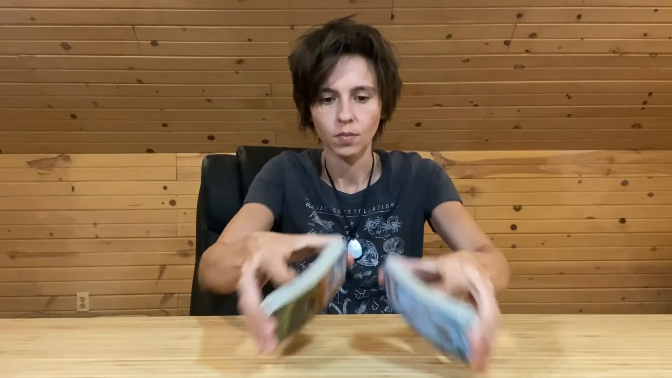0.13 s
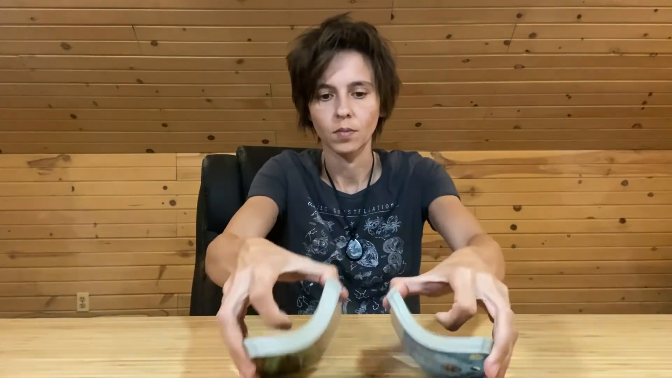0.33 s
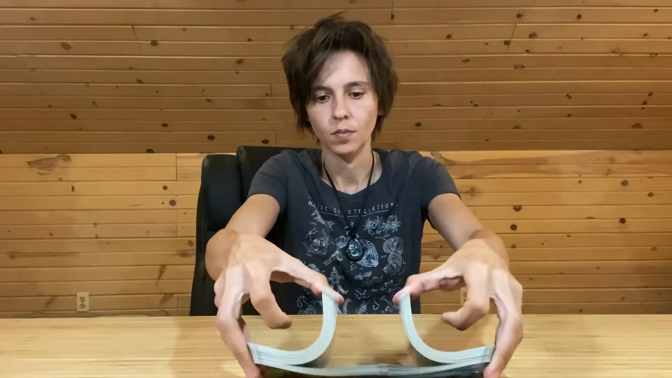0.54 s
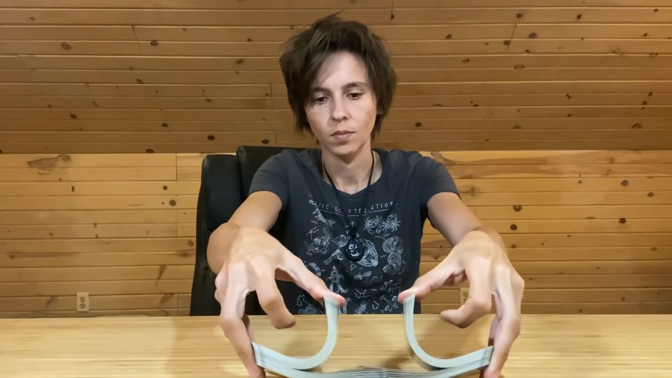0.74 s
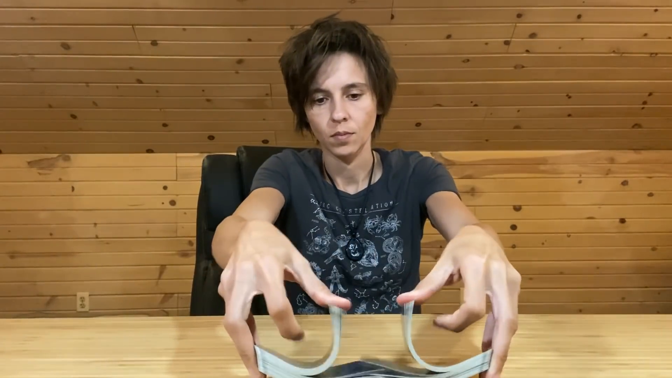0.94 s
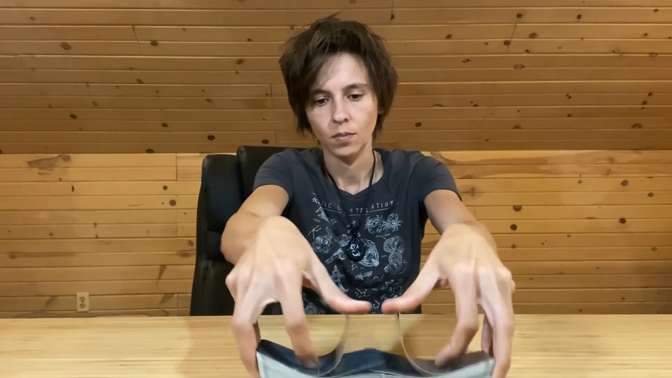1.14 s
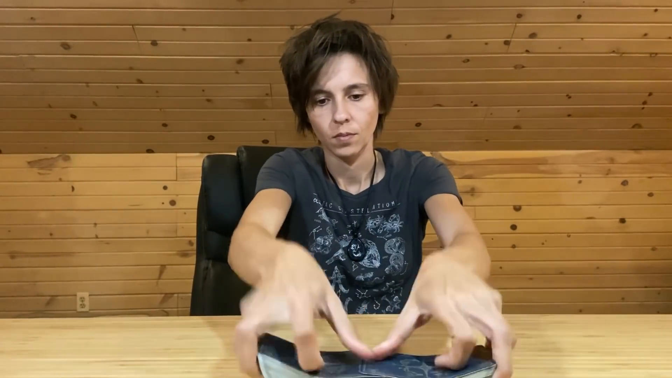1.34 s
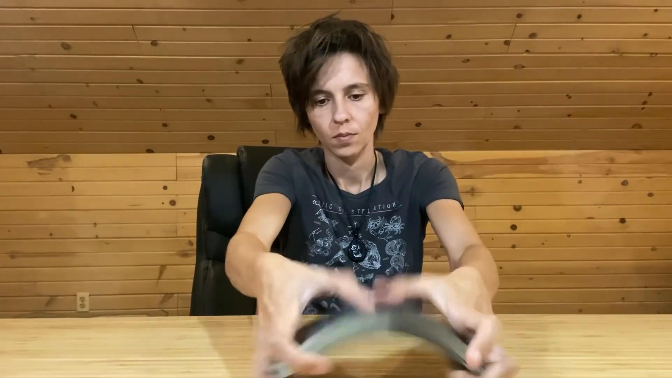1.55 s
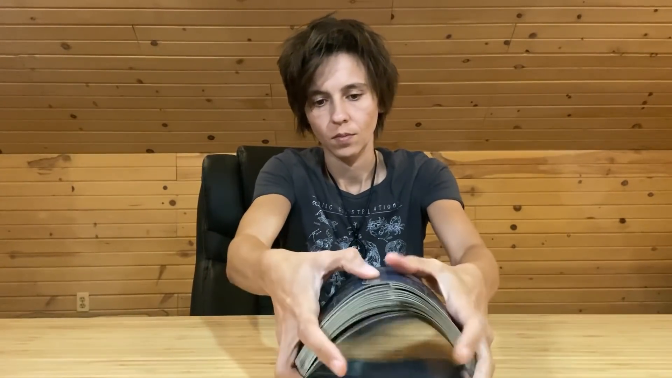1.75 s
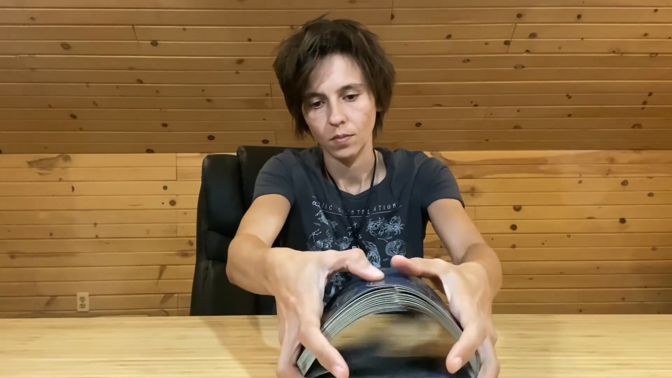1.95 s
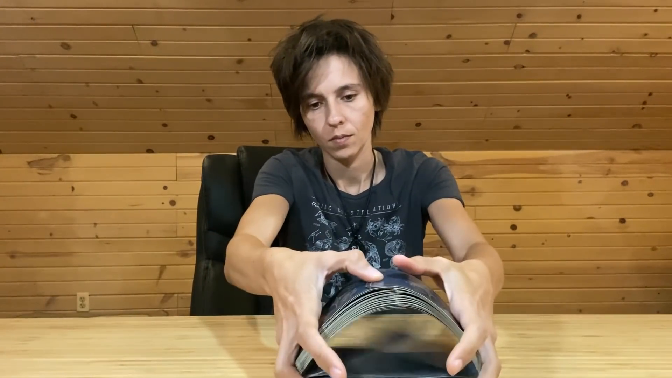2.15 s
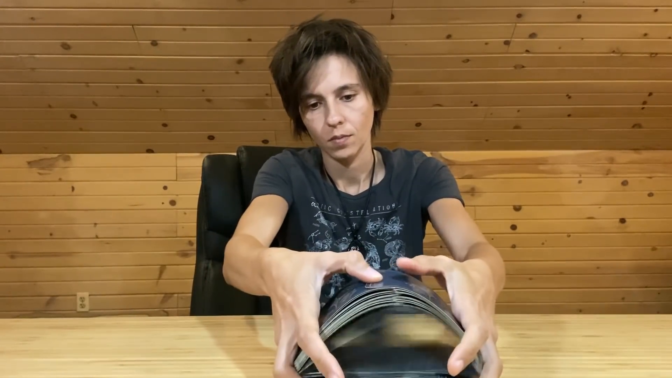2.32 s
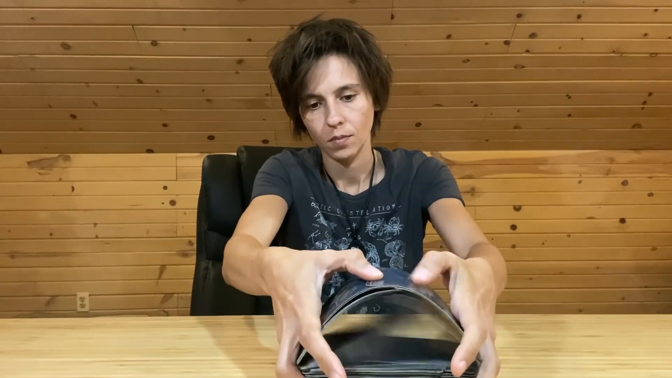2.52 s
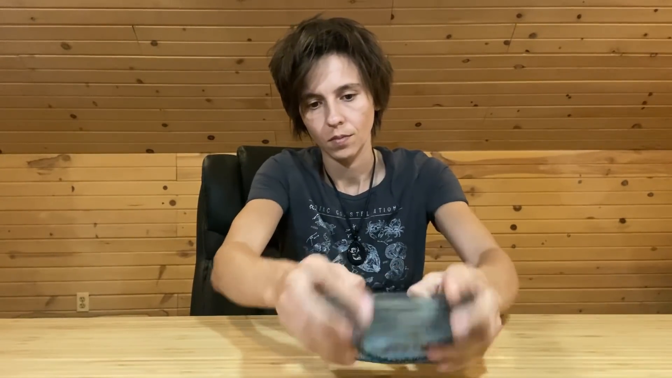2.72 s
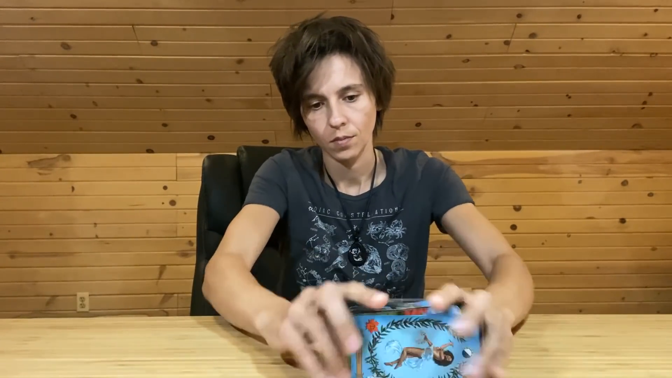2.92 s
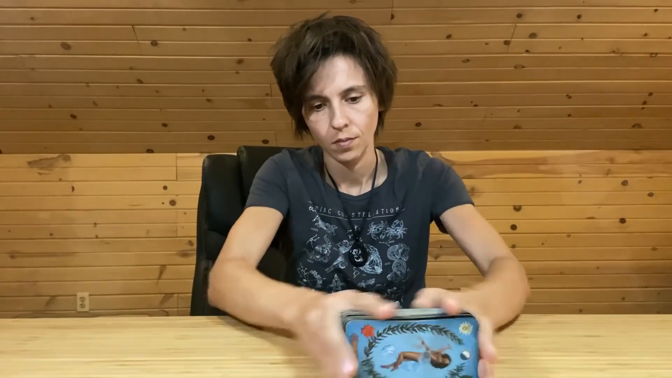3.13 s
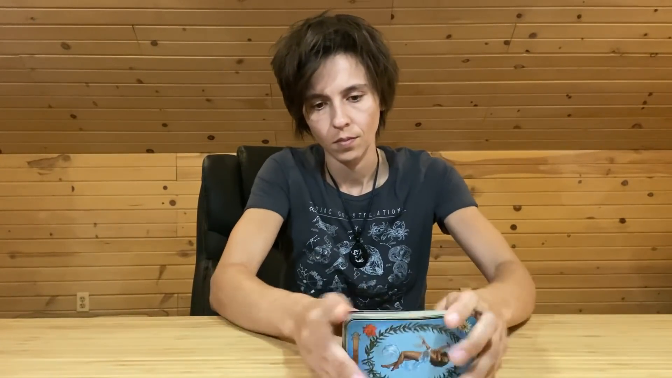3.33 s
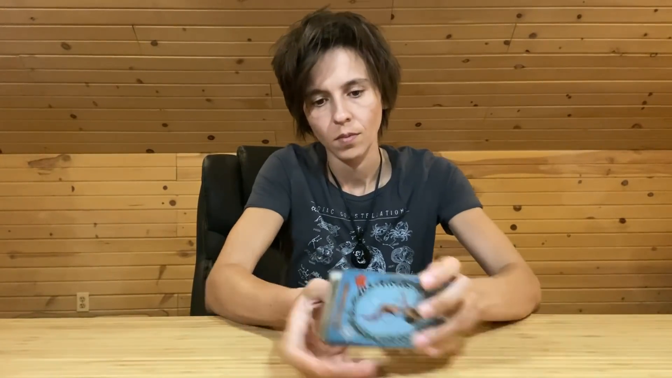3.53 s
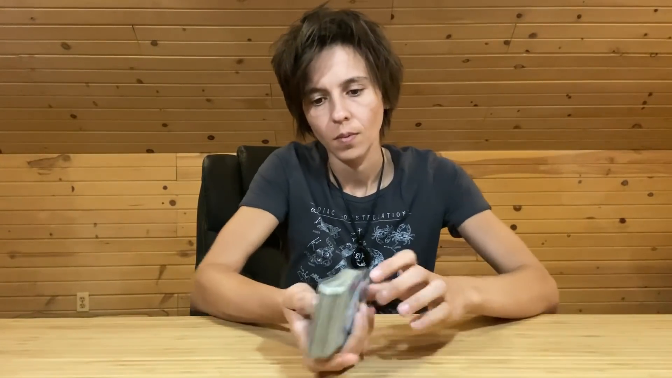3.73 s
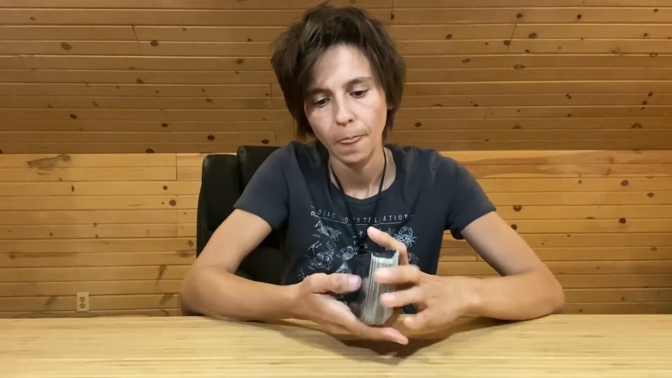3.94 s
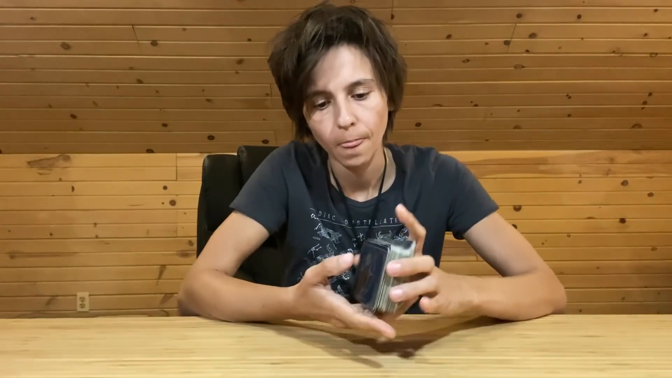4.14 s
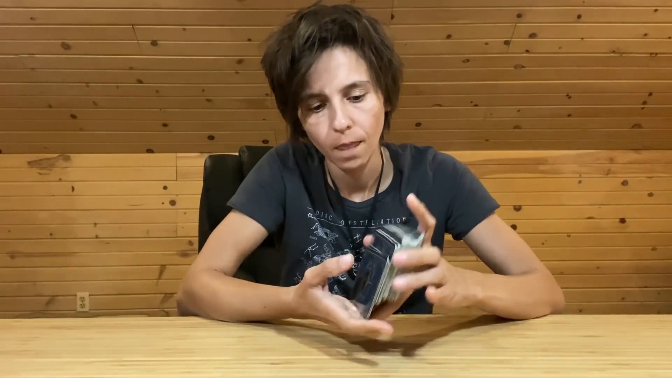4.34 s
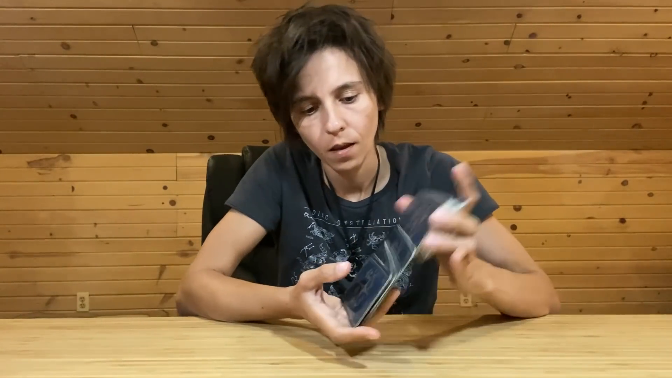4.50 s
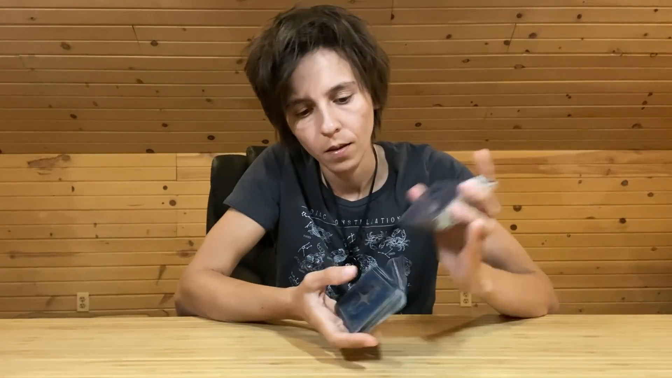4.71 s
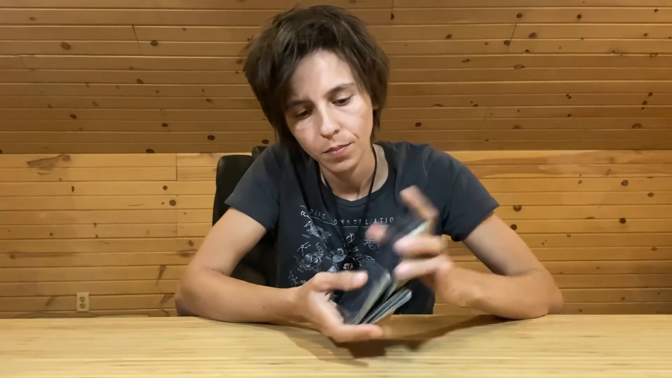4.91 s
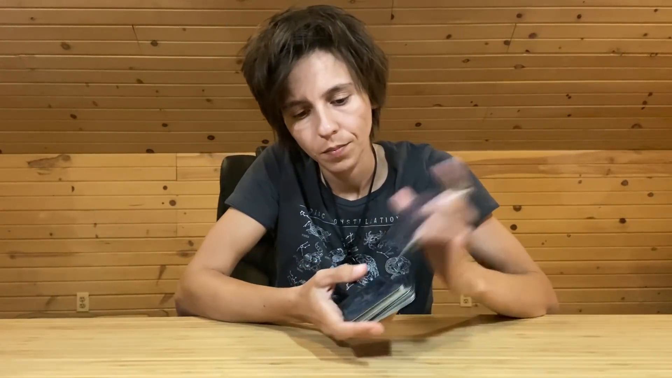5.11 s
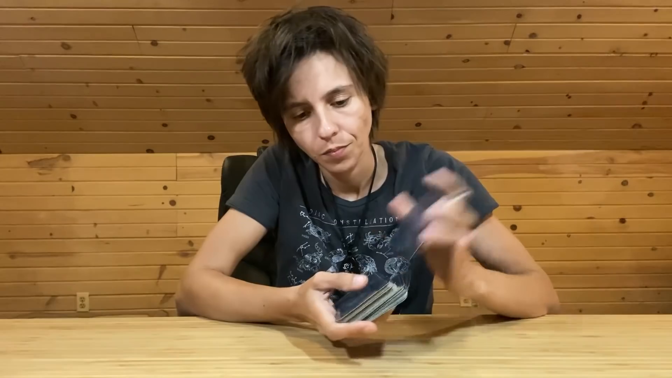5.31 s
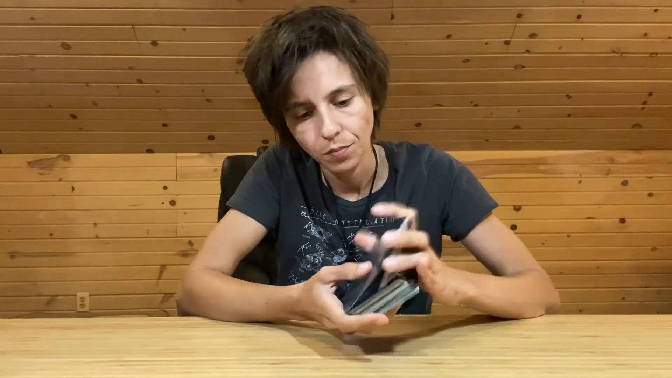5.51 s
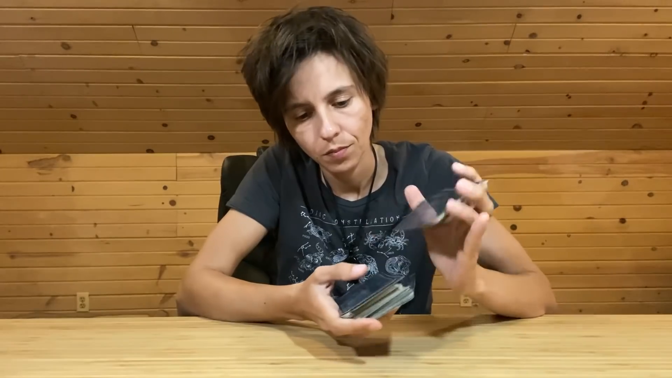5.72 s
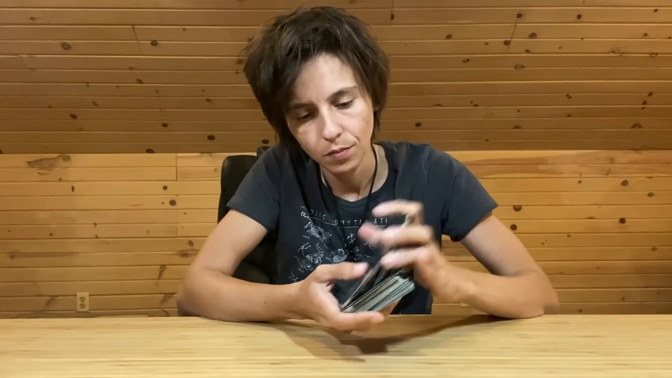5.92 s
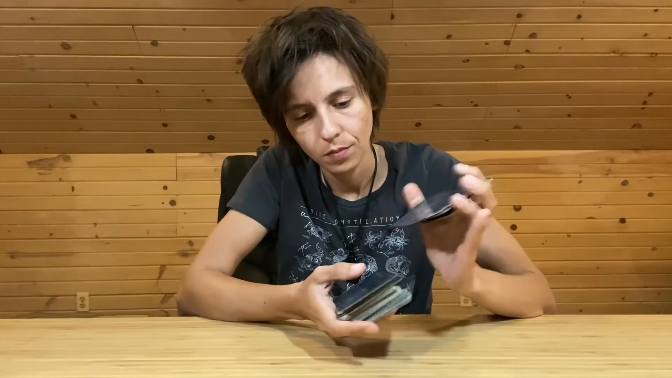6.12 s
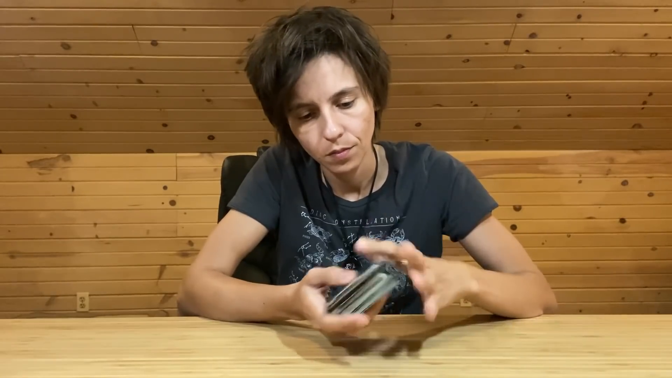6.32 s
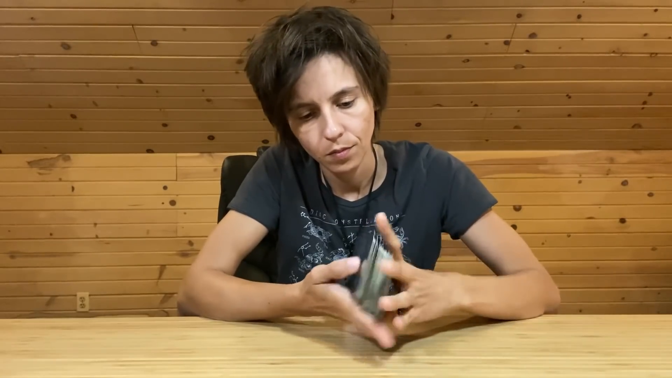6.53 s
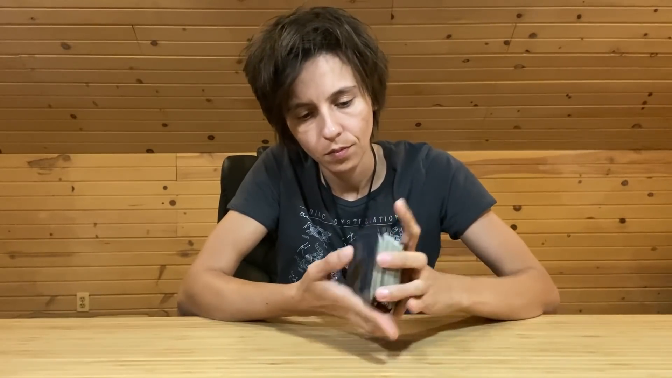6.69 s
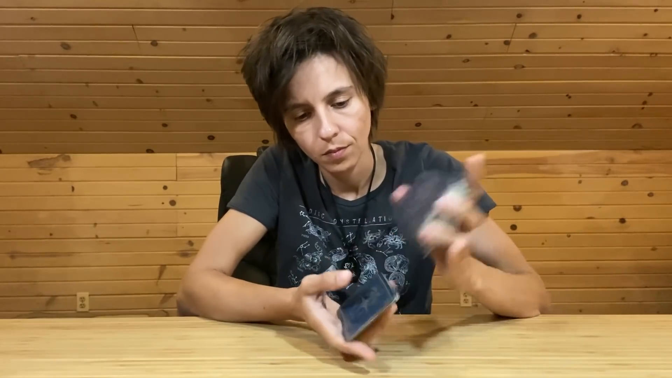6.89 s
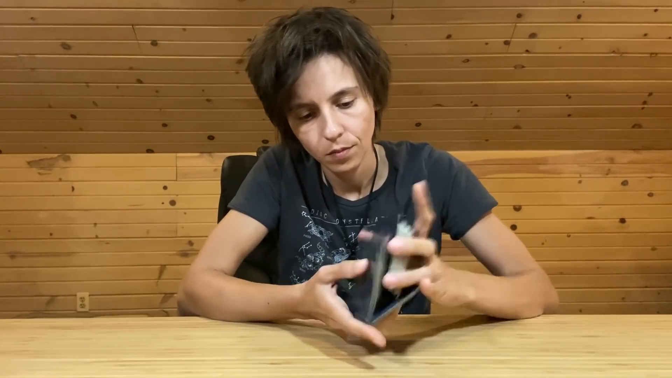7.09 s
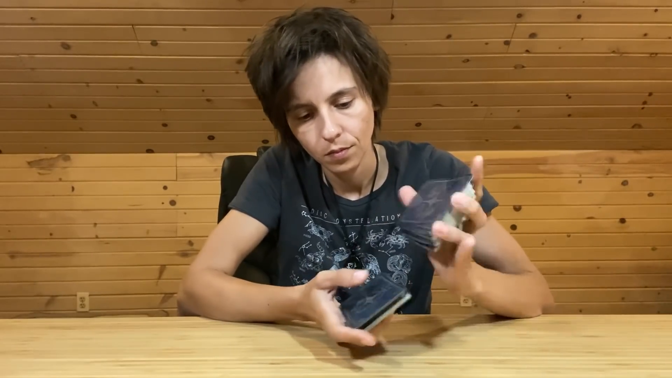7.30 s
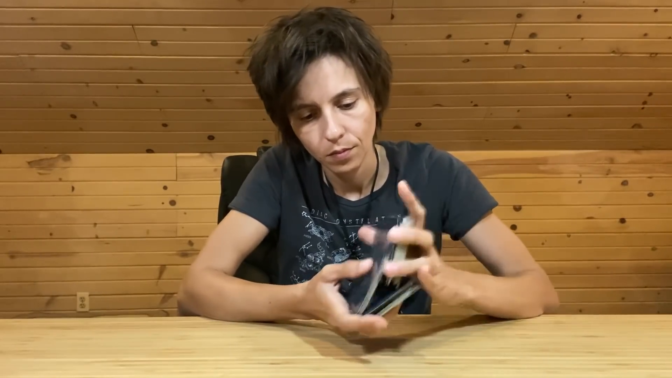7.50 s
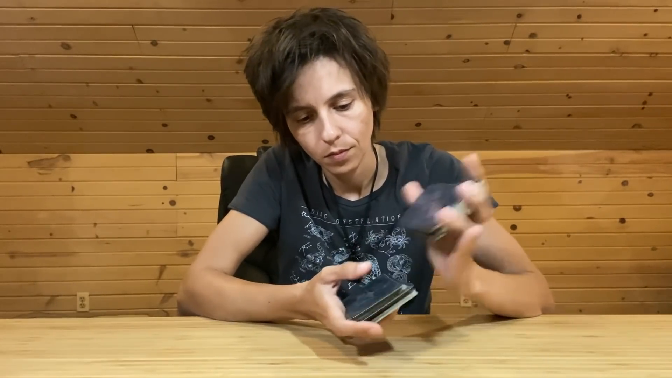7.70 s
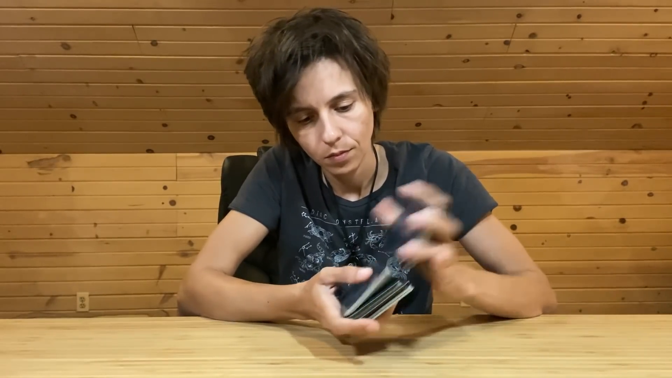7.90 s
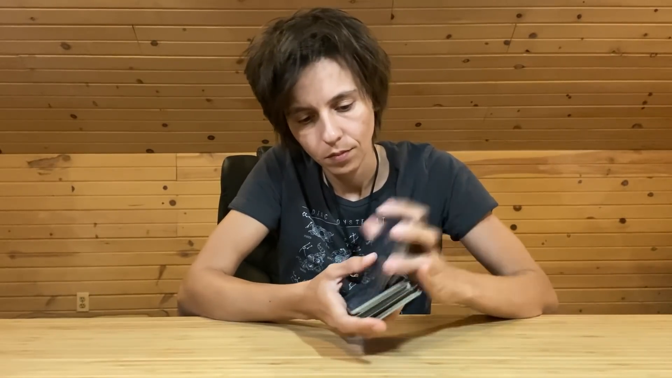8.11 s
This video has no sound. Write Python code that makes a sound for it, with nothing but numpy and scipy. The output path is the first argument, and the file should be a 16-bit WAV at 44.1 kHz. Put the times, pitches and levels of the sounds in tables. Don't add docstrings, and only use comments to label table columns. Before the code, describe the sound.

Close stereo microphone on a wooden table in a small wooden room. Two halves of a card deck thump down and riffle together in a loud, crackling burr with low table thuds. Palms press, then the arched cards pour in a softer papery rush. The deck is knocked on edge twice with hard clacks, rocks to rest, and is shuffled overhand in quiet, spaced slides and snaps.

```python
import sys
import numpy as np
from scipy import signal
from scipy.fft import rfft, irfft, next_fast_len
from scipy.io import wavfile
from scipy.ndimage import uniform_filter1d

SR = 44100
rng = np.random.default_rng(int(sys.argv[2]) if len(sys.argv) > 2 else 0)


def unload_audio(sound):
    columns = np.transpose(np.atleast_2d(sound))
    steps = np.round(np.clip(columns, -1, 1) * 32767)
    wavfile.write(sys.argv[1], SR, steps.astype(np.int16))


def gain_from_decibels(decibels):
    exponent = np.asarray(decibels, float) / 20
    return 10 ** exponent


N = 359415
SPAN = 8192

# (frequency [Hz], level per Hz [dB])
SNAP = [(1470, -32), (2500, -1.5), (3250, -2.5), (4600, -5), (7360, -6), (9350, -5.5), (12700, -8),
        (15800, -7)]
# (frequency [Hz], level per Hz [dB])
THUD = [(1760, -27.5), (3000, -2.5), (3260, -1.5), (3570, -4.5), (4680, -11), (7410, -16.5), (15800, -59)]
# (frequency [Hz], width [Hz], level [dB])
BENT_CARD = [(1042, 310, 5), (1850, 140, 4), (2190, 610, -6.5), (2730, 190, -6.5), (680, 110, -10)]
# (frequency [Hz], width [Hz], level [dB])
PACKET = [(822, 720, -4), (1140, 620, 1), (1480, 340, -1), (2160, 460, -6.5)]
# (frequency [Hz], width [Hz], level [dB])
TABLE = [(176, 14, 4), (239.5, 42, 1.5), (334.8, 48, 2.5), (359, 74, 3.5), (385, 350, -9),
         (123, 22.75, 0.5)]
# (frequency [Hz], width [Hz], level [dB])
LOADED_TABLE = [(193, 33, 7.5), (271, 21, 3.5), (323, 26, -0.5), (367, 38, 1.5), (432, 92, -7),
                (125, 30, -4)]
# (frequency [Hz], width [Hz], level [dB])
TABLE_EDGE = [(408, 45, 1.5), (340, 39, 1.5), (225, 114, -4), (476, 99, -7.5)]

BENT = dict(ring_db=6.5, wide=0.77, lead_db=-26, room_db=-17, lag=0.57)
EDGE = dict(snap_db=0, ring_db=7, flat=0.2346, wide=0.8, lead_db=-18, room_db=-18)


def unit(x):
    return x / np.sqrt(np.mean(x ** 2))


def shape(hz, points):
    f, db = np.transpose(points)
    return gain_from_decibels(np.interp(np.log(hz + 1), np.log(f), db, left=-90, right=-90))


def ring(hz, modes, detune=1):
    total = 0
    for k, (f, width, db) in enumerate(modes):
        damping = 1j * hz * width
        total = total + (-1) ** k * gain_from_decibels(db) * damping / ((f * detune) ** 2 - hz ** 2 + damping)
    return total


def noise(gain, alike):
    size = next_fast_len(N)
    hz = np.arange(size // 2 + 1) * SR / size
    mid, side = rfft(rng.standard_normal((2, size)))
    c = np.clip(alike(hz), 0, 1)
    pair = np.sqrt(1 + c) * mid + np.sqrt(1 - c) * side * np.array([[1], [-1]])
    return unit(irfft(pair * gain(hz), size)[:, :N])


def ports(hz):
    return 0.032 + 0.18 / (1 + (hz / 1800) ** 2)


def flicker(rate, db):
    k = int(SR / rate)
    steps = np.repeat(rng.standard_normal(N // k + 1), k)
    return gain_from_decibels(db * uniform_filter1d(uniform_filter1d(steps, k), k)[:N])


def strokes(rows, rise, fall):
    s, held, *peaks = np.transpose(rows)[:, :, None]
    t = np.arange(0, N / SR, .001)
    loss = rise * np.maximum(s - t, 0) + fall * np.maximum(t - s - np.abs(held), 0)
    return np.array([(peak - loss).max(axis=0) for peak in peaks])


def gains(db):
    ms = np.arange(N) / SR * 1000
    return [gain_from_decibels(np.interp(ms, np.arange(len(c)), c)) for c in db]


def still_air():
    # (frequency [Hz], level per Hz [dB])
    air_colour = [(88, -33), (150, -12.5), (355, -16), (500, -11.5), (1010, -25.5), (1420, -27),
                  (11000, -45), (14300, -75.5)]
    return gain_from_decibels(-62) * noise(lambda hz: shape(hz, air_colour), ports)


def shaking():
    # (time [s], held [s], deep level [dB], board level [dB])
    pushes = [(0, 0.22, -45, -50.5), (.28, 0.083, -36, -46), (.45, 0.12, -34.5, -34.5),
              (.6, 0.096, -36, -32.5), (.86, .12, -38.5, -30), (1.02, 0.2, -26, -24.5),
              (1.42, 0.034, -31.5, -43.5), (1.56, 0.0078, -32.5, -36), (1.68, 0.54, -41.5, -47.5),
              (2.48, 0.046, -37, -43), (2.6, 0.28, -43.5, -46.5), (3.17, 0.045, -42, -29),
              (3.3, 0.16, -41.5, -37), (3.62, 0.0051, -34.5, -35.5), (4.74, 0.475, -49, -58),
              (5.31, .3, -48, -58.5), (5.63, 0.018, -37, -53.5), (5.99, 0.0069, -43, -58.5),
              (6.38, 0.01, -40, -44), (7.22, 0.01, -41, -53), (7.33, 0.56, -49, -58),
              (7.92, 0.01, -42, -48.5)]
    # (frequency [Hz], width [Hz], level [dB])
    frame_modes = [(36.2, 10, -19), (60.6, 25, -5.5), (84, 12, 0), (110, 32, -3), (140, 42, -5)]
    resting_db = [[-51], [-62.5]]
    deep, board = gains(np.maximum(strokes(pushes, rise=158.5, fall=107.5), resting_db))
    wobble = noise(lambda hz: ring(hz, frame_modes) / (1 + (hz / 165) ** 6), lambda hz: .65 + 0 * hz)
    boards = noise(lambda hz: ring(hz, TABLE), ports)
    return deep * flicker(12, 4.0) * wobble + board * flicker(21, 5.6) * boards


def regripping():
    # (time [s], held [s], hiss level [dB], scrape level [dB])
    regrips = [(0, 0.22, -87, -70.5), (.29, 0.031, -62, -51.5), (1.4, 0.23, -52.5, -51.5),
               (2.85, 0.13, -53.5, -59.5), (3.3, 0.51, -64, -74), (3.6, 0.087, -61.5, -53),
               (3.72, 0.015, -52.5, -46.5), (3.83, 0.0093, -59.5, -48.5), (4.0, 0.3, -74, -76.5),
               (4.5, 0.03, -66, -70), (4.619, 0.011, -57.5, -66), (6.55, 0.13, -61.5, -65.5),
               (6.8, 0.052, -60, -70), (7.069, 0.0097, -71, -62.5)]
    return strokes(regrips, rise=167, fall=119)


def riffle_rubbing():
    # (time [s], held [s], hiss level [dB], scrape level [dB])
    riffle_rub = [
        (.598, .54, -28.5, -30.5),
    ]
    return strokes(riffle_rub, rise=166, fall=107.5)


def cascade_flow():
    # (time [s], hiss level [dB])
    falling = [
        (1.661, -48),
        (1.7, -34.5),
        (1.86, -35.5),
        (2.1, -38.5),
        (2.32, -38),
        (2.42, -37),
        (2.62, -31.5),
        (2.74, -33.5),
        (2.818, -51.5),
    ]
    flow = np.interp(np.arange(0, N / SR, .001), *np.transpose(falling), left=-120, right=-120)
    return [flow, -43 + 1.55 * (flow + 34.5)]


def squaring():
    # (time [s], held [s], hiss level [dB], scrape level [dB])
    flush = [
        (2.974, .04, -51, -28.5),
        (3.164, 0.031, -50.5, -32),
    ]
    return strokes(flush, rise=514.5, fall=82.5)


def overhand_passes():
    # (time [s], held [s], hiss level [dB], scrape level [dB])
    slides = [
        (4.889, 0.053, -48, -48.5),
        (5.243, 0.057, -45.5, -47.5),
        (5.594, 0.0075, -39, -33),
        (5.951, 0.02, -40, -33),
        (6.293, 0.047, -39, -37.5),
        (7.19, 0.0052, -40.5, -31),
        (7.533, 0.0076, -39.5, -34),
        (7.875, 0.0094, -37, -36),
    ]
    rustles = [
        (4.99, 0.029, -56, -54.5),
        (5.34, 0.018, -62.5, -52),
        (6.06, 0.0224, -61, -57),
        (5.232, .01, -68, -62),
        (5.575, .02, -62, -61),
        (6.279, .01, -64, -64),
        (7.156, .03, -53.5, -52),
        (7.505, .03, -50.5, -51),
        (7.854, .02, -51, -60.5),
    ]
    return np.maximum(strokes(slides, rise=3000, fall=240), strokes(rustles, rise=1500, fall=240))


def sliding():
    # (frequency [Hz], level per Hz [dB])
    hiss_colour = [(1470, -27.5), (2500, -14), (3790, -10), (6510, -6), (9870, -6), (12600, -12),
                   (14200, -9), (15800, -6)]
    # (frequency [Hz], level per Hz [dB])
    dull_colour = [(400, -26), (600, -3), (1050, -5.5), (1400, -2.5), (2500, -5), (4000, -12),
                   (7000, -29.5)]
    # (frequency [Hz], width [Hz], level [dB])
    scrape_body = [(510, 180, -2.5), (1034, 210, 0), (1720, 320, -3.5), (2500, 850, -2.5), (3960, 2700, -5)]
    # (frequency [Hz], width [Hz], level [dB])
    faces = [(2400, 1400, -8), (4500, 2400, -8)]
    gestures = [regripping(), riffle_rubbing(), cascade_flow(), squaring(), overhand_passes()]
    hiss, dull = gains(np.max(gestures, axis=0))
    flutter = flicker(30, 2.6) * flicker(120, 1.5)
    rub = noise(lambda hz: shape(hz, hiss_colour), ports)
    for f, width, db in faces:
        patch = noise(lambda hz: ring(hz, [(f, width, 0)]) ** 2, ports)
        rub = rub + gain_from_decibels(db) * flicker(24, 5.5) * patch
    scrape = noise(lambda hz: shape(hz, dull_colour) * ring(hz, scrape_body), ports)
    return flutter * (hiss * flicker(400, 2.0) * rub + dull * flicker(160, 0.69) * scrape)


def contacts(events, snap, body, board, snap_db, ring_db, thump_db, flat, wide, lead_db, room_db, lag,
             pitch=1, pan_db=0):
    s, peak_db, ring_rel, length, *bright = np.transpose(events)[:, :, None]
    lead_ms = 25
    ms = np.arange(SPAN) / SR * 1000 - lead_ms
    after = np.maximum(ms, 0)
    hz = np.arange(SPAN // 2 + 1) * SR / SPAN
    draw = rng.standard_normal((len(events), 3 * SPAN + 4))
    detune, lag_draw, turn_draw, pan_draw = draw[:, :1], draw[:, 1:2], draw[:, 2:3], draw[:, 3:4]
    both, left, right = np.split(draw[:, 4:], 3, axis=1)
    grit = both + wide * np.array([left, right])
    pan = pan_db + 0.82 * pan_draw

    blow = (after / length) ** 1.56 * np.exp(1.5 - 2.21 * after / length)
    blow = blow + 0.5 * np.exp(-((ms - .7 * length) / 0.45) ** 2)
    scrape = gain_from_decibels(lead_db) * np.exp(-np.abs(ms) / 7)
    tail = gain_from_decibels(room_db) * np.sqrt(length) * (1 - np.exp(-(after / 1.4) ** 2))
    tail = tail * np.exp(-np.log(1000) * after / 220) * np.clip((ms[-1] - ms) / 60, 0, 1)
    soaked = 1 / np.sqrt(1 + (hz / 9000) ** 2)
    push = rfft((blow + scrape) * gain_from_decibels(np.array([pan, -pan]) / 2) * grit) + rfft(tail * grit) * soaked
    late = np.exp(-2j * np.pi * hz / SR * (lag + 2.3 * lag_draw))

    colour = 1
    if bright:
        octaves = np.log2((hz + 1) / bright[0])
        softness = (1 + (hz / bright[0] / 2.8) ** 2) ** 0.23
        colour = gain_from_decibels(7 * np.exp(-(octaves / 0.23) ** 2)) / softness
    in_air = shape(hz, snap) * colour
    in_deck = ring(hz, body, pitch + 0.0073 * detune) * colour
    in_table = ring(hz, board) / (1 + (hz / 900) ** 4)
    # (response, level [dB], turn between ports [rad], left lean [dB])
    layers = ((in_air, snap_db, 0, 0),
              (in_deck, ring_db + ring_rel, .5, 0),
              (in_table, thump_db + flat * ring_rel, .3, -3.5))
    starts = ((s[:, 0] - lead_ms / 1000) * SR).astype(int)
    out = np.zeros((2, N + SPAN))
    for response, db, turn, lean_db in layers:
        far = push[1] * late * np.exp(1j * turn * np.tanh(turn_draw))
        pair = irfft(np.array([push[0] * gain_from_decibels(lean_db), far]) * response, SPAN)
        pair = pair / np.abs(pair).max(axis=(0, 2), keepdims=True) * gain_from_decibels(peak_db + db)
        for k, at in enumerate(starts):
            out[:, at:at + SPAN] += pair[:, k]
    return out[:, :N]


def setdowns():
    # (time [s], thump peak [dB], deck ring over thump [dB], length [ms])
    events = [
        (0.198, -51, 2.5, 1.5),
        (0.2685, -21, -5, 1.4),
        (.893, -12.5, -27.5, 2.1),
        (.926, -11.5, -27.5, 1.6),
        (1.4345, -22, -9.5, 1.6),
        (1.462, -27, -23, 4.3),
        (1.5327, -14, -21.5, 0.88),
        (1.558, -23, -17.5, 1.7),
        (1.572, -20, -23, 1.2),
        (1.604, -20.5, -21, 1.06),
    ]
    return contacts(events, SNAP, BENT_CARD, TABLE, snap_db=-13.0, thump_db=2.0, flat=0, **BENT)


def riffle():
    # (time [s], snap peak [dB], deck ring over snap [dB], length [ms], brightest pitch [Hz])
    events = [(0.4124, -15.5, 3.5, 3.1, 1112), (0.4245, -9.5, -4.5, 2.3, 673),
              (0.4462, -6, -6.5, 2.2, 2244), (0.4606, -15, -0.5, 4.2, 1153), (0.4828, -7, -11, 1.63, 1854),
              (0.499, -20.5, -3.5, 4, 803), (0.5087, -13.5, -8, 3.9, 1720), (0.543, -13, -2.5, 2.8, 1145),
              (0.5494, -12, -9, 2.3, 8110), (0.5567, -12.5, -11, 1.9, 1043), (0.5605, -4, -3.5, 2.54, 2400),
              (0.5714, -7, -7.5, 5.2, 987), (0.583, -11.5, -13, 1.5, 693), (0.598, -15.5, -7.5, 1.8, 697),
              (0.618, -6.5, -6, 1.5, 1214), (0.636, -18.5, -7.5, 2, 1926), (0.6472, -3.5, -14.5, 1.8, 6278),
              (0.6717, -11.5, -9.5, 3.5, 839), (0.6969, -16, -13, 1.9, 1495),
              (0.7154, -10.5, -5.5, 3.7, 2454), (0.7238, -0.5, -19.5, 1.3, 8410),
              (0.7534, -11.5, -3, 2, 1140), (0.7715, -15, -13, 1.4, 6790), (0.7879, 2.5, -25.5, 1.9, 8540),
              (0.8116, -6.5, -16.5, 2.4, 3217), (0.847, -6.5, -13.5, 2.2, 4650),
              (0.8742, -7, -6.5, 1.8, 3013), (0.8911, -2.5, -15.5, 3.7, 5196), (0.914, -8, -7.5, 4.7, 2500),
              (0.9236, -1.5, -11, 1.7, 3000)]
    return contacts(events, SNAP, BENT_CARD, LOADED_TABLE, snap_db=5.0, thump_db=-3.5, flat=0.52, **BENT)


def pile():
    # (time [s], snap peak [dB], deck ring over snap [dB], length [ms], brightest pitch [Hz])
    events = [(0.9504, -9, -9.5, 2.7, 6020), (0.9686, -3, -11, 4.8, 867), (0.9953, -18.5, -3.5, 1.7, 1618),
              (1.0117, -11.5, 2, 2.4, 918), (1.0446, -7.5, -1.5, 1.7, 1850), (1.0468, -8, -9.5, 3.1, 1854),
              (1.062, -10, -17, 4.4, 8490), (1.0705, -7, -10.5, 4.9, 4920), (1.1103, -11, 1, 5.7, 1054),
              (1.1204, -5.5, -16, 4, 8484), (1.1429, -13, -3.5, 3.1, 690), (1.1805, -6.5, 4.5, 1.25, 1150),
              (1.1983, -14, -11.5, 4.6, 990), (1.2156, -10.5, -6, 3.9, 703), (1.2335, -5.5, -17, 1.9, 4264),
              (1.2451, -10, -22.5, 7, 5840), (1.2594, -12.5, -10, 8.9, 5360), (1.286, -12, -13, 4.4, 5520)]
    return contacts(events, SNAP, BENT_CARD, LOADED_TABLE, snap_db=4.0, thump_db=2.5, flat=0.7, **BENT)


def cascade():
    # (time [s], snap peak [dB], deck ring over snap [dB], length [ms], brightest pitch [Hz])
    events = [(1.6803, -26, -17.5, 1.6, 8400), (1.8282, -12, -14, 0.75, 3220), (1.8537, -15, -19, 2, 3100),
              (1.862, -16.5, -10.5, 3.1, 990), (1.889, -20, -7, 1.5, 1060), (1.8964, -20.5, -12, 1.1, 920),
              (1.9343, -27, -13, 1.5, 6430), (1.9854, -21, -7.5, 1.1, 920), (2.0014, -9, -14.5, 0.62, 1670),
              (2.0203, -16, -4, 0.79, 1720), (2.1198, -28, -18, 1.5, 8490), (2.1428, -24.5, -15, 1.7, 4550),
              (2.1934, -16.5, -15, 2.7, 1250), (2.2151, -30, -17.5, 3.3, 2270),
              (2.271, -34.5, -11.5, 1.1, 2230), (2.3039, -22.5, -12.5, 1.5, 4570),
              (2.3553, -26, -13, 1.3, 3220), (2.3688, -26.5, -15, 1.5, 2440), (2.3937, -20, -13.5, 2, 5470),
              (2.4401, -21, -12, 1.5, 2610), (2.4543, -14, -13, 2.4, 7700), (2.4664, -20.5, -7.5, 1, 710),
              (2.4894, -22, -5, 1.1, 1320), (2.5052, -14, -12.5, 1.4, 2670),
              (2.5656, -13.5, -13.5, 1.5, 920), (2.596, -13, -16, 0.78, 1720),
              (2.6700, -5, -21, 1.57, 4060), (2.692, -27.5, -17, 1.9, 4240)]
    return contacts(events, SNAP, BENT_CARD, TABLE, snap_db=0.5, ring_db=1.5, thump_db=-14.0, flat=0.47,
                    wide=0.64, lead_db=-17, room_db=-15.5, lag=1.7)


def arch():
    # (time [s], snap peak [dB], deck ring over snap [dB], length [ms])
    events = [
        (1.7564, -29, 3.9, 2.3),
        (1.7754, -31, 5, 3),
    ]
    return contacts(events, SNAP, BENT_CARD[:1], TABLE, snap_db=8, thump_db=1.0, flat=0, pitch=1.1, **BENT)


def knocks():
    # (time [s], snap peak [dB], deck ring over snap [dB], length [ms], brightest pitch [Hz])
    events = [
        (2.954, -18, 11.5, 2.9, 1024),
        (2.965, -17, 4, 1.6, 990),
        (2.9685, -7.5, 5, 6.1, 1922),
        (2.9801, -9.5, -5, 1.9, 1900),
        (3.0009, -15.5, -4.5, 3, 2500),
        (3.012, -17, 0.5, 3, 2202),
        (3.058, -28.5, 3.5, 2.7, 1140),
        (3.085, -33.5, 2, 2.5, 696),
    ]
    # (frequency [Hz], width [Hz], level [dB])
    square_deck = [(1046, 150, 2.5), (1705, 110, 3), (1930, 64, -2.5), (2425, 180, 4), (3200, 500, -7.5),
                   (3780, 300, -18.5)]
    return contacts(events, THUD, square_deck, TABLE, thump_db=-7, lag=-.6, pan_db=-1.5, **EDGE)


def reknocks():
    # (time [s], snap peak [dB], deck ring over snap [dB], length [ms], brightest pitch [Hz])
    events = [
        (3.1348, -32.5, 8.5, 2.8, 1720),
        (3.1536, -22, 8.5, 1.2, 1042),
        (3.1605, -7, 5, 1.14, 1977),
        (3.1668, -11, 8.5, 3.1, 2777),
        (3.173, -13.5, 4.5, 2.3, 1863),
        (3.1825, -12, 8.5, 4.4, 1969),
        (3.2034, -23.5, -1.5, 1.6, 700),
        (3.212, -18.5, 2, 1.9, 700),
    ]
    # (frequency [Hz], width [Hz], level [dB])
    tilted_deck = [(1010, 65, 2.5), (1653, 96, -1), (1940, 100, -2.5), (2120, 90, -0.5), (2610, 96, 2.5),
                   (3114, 400, -4.5), (3870, 210, -23)]
    return contacts(events, THUD, tilted_deck, TABLE_EDGE, thump_db=-11.0, lag=-.4, pan_db=-2.5, **EDGE)


def settles():
    # (time [s], thump peak [dB], deck ring over thump [dB], length [ms])
    events = [(3.305, -31.5, 4, 54), (3.3752, -14.5, -8.5, 6), (3.3974, -17.5, -11.5, 5.5),
              (3.4204, -27.5, -6, 9.5), (3.5804, -26, -37, 2.5), (3.6144, -24, -24.5, 3.4),
              (3.6344, -43, -19.5, 4.3), (3.69, -64.5, 15.5, 47), (6.366, -33, -11, 6),
              (6.395, -41, -9, 6.2), (6.77, -70, 14.5, 34), (6.83, -68, 16, 39), (3.6, -63.5, 15, 60)]
    return contacts(events, THUD, BENT_CARD, TABLE_EDGE, snap_db=-48.0, ring_db=4.0, thump_db=4.5, flat=0,
                    wide=0.3494, lead_db=-28, room_db=-20.0, lag=1.0)


def overhand():
    # (time [s], snap peak [dB], deck ring over snap [dB], length [ms], brightest pitch [Hz])
    events = [(3.9684, -48, 4, 7, 980), (4.8853, -30, -4, 1, 1056), (4.897, -26.5, -1.5, 2.08, 2400),
              (4.9856, -38.5, 3, 2.7, 880), (5.247, -36, 3.5, 2.2, 1050), (5.2599, -22.5, -4, 2.52, 6890),
              (5.2864, -31, -6, 1.9, 8490), (5.3143, -37, 1.5, 4.2, 994), (5.3534, -45.5, 10.5, 3.6, 870),
              (5.5794, -43.5, 2.5, 1.94, 1054), (5.5903, -15, -1.5, 1.3, 1530),
              (5.6054, -41, -12, 2.24, 1850), (5.9484, -25, 7, 0.97, 1140), (5.9653, -24, 6.5, 1.28, 2430),
              (6.0751, -36.5, -5.5, 1.18, 1312), (6.2834, -19.5, -6, 3.4, 7920),
              (6.2896, -16, -3, 1.7, 3450), (6.3619, -16.5, -5.5, 3.3, 4930), (6.791, -53, 6, 5.3, 800),
              (6.845, -53, 4, 7, 703), (6.901, -51.5, -1.5, 2, 700), (6.9556, -45, -7, 3, 8490),
              (7.1516, -44, 9, 0.99, 2130), (7.1865, -15, -9, 3.6, 2670), (7.1994, -37, -13, 2.05, 2780),
              (7.2325, -25, -23, 1.1, 3690), (7.287, -44.5, 4, 1.7, 1310), (7.322, -50, 7.5, 2.8, 713),
              (7.5018, -45, 9.5, 1.54, 1845), (7.5283, -18, 6.5, 1.94, 1630), (7.556, -28, -11, 2, 1400),
              (7.5794, -24.5, -10, 1.5, 4860), (7.8501, -40, 2, 0.6, 2820), (7.876, -31.5, 12.5, 2.4, 1080),
              (7.885, -31.5, 4, 3.9, 1140)]
    return contacts(events, SNAP, PACKET, TABLE, snap_db=2.0, ring_db=1.5, thump_db=-13.5, flat=0.78,
                    wide=1.34, lead_db=-27.5, room_db=-16.0, lag=-0.33)


def bumps():
    # (time [s], bump peak [dB], deck ring over bump [dB], length [ms])
    events = [(4.675, -38, -46, 7.3), (4.731, -35, -38, 6.5), (4.886, -37, -40, 6.7),
              (5.029, -37.5, -42, 8.6), (5.157, -35.5, -47, 4.9), (5.281, -25.5, -42.5, 5.4),
              (5.405, -29, -37, 8.1), (5.538, -32.5, -41, 6.1), (5.995, -29.5, -42.5, 4.6),
              (6.099, -37.5, -38.5, 5.7), (6.335, -23.5, -39, 8.5), (6.45, -40, -40, 4.4),
              (6.529, -45, -40, 6.5), (6.725, -49, -40, 6.3), (7.199, -35, -40, 6.6),
              (7.323, -39.5, -44, 5.8), (7.422, -36, -38, 5.9), (7.554, -32, -42, 9.2),
              (7.705, -36.5, -41.5, 6.8), (7.847, -52, -39, 5), (7.906, -43, -40, 5)]
    # (frequency [Hz], width [Hz], level [dB])
    bumped_frame = [(99, 10.5, -0.5), (133, 55, -14), (84, 16, -7.5)]
    return contacts(events, SNAP, PACKET, bumped_frame, snap_db=-60, ring_db=-3, thump_db=1.5, flat=0,
                    wide=0.43, lead_db=-27, room_db=-26.5, lag=.1)


def scene():
    bed = still_air() + shaking() + sliding()
    shuffle = setdowns() + riffle() + pile() + cascade() + arch()
    square = knocks() + reknocks() + settles()
    return bed + shuffle + square + overhand() + bumps()


def housing(dry):
    # (frequency [Hz], share [0-1], turn [rad])
    sharing = [(150, 0.3, 0), (450, 0.06, -3), (4350, 0.1, -5), (6050, 0.2, -2.5), (8000, 0.6, -2),
               (9680, 0.8, 0.5), (11200, 0.4, 1.22), (12270, 0.94, 3), (13650, 0.9, 4.5), (14200, 0.4, 6),
               (15640, .95, 8)]
    size = next_fast_len(N + SPAN)
    hz = np.arange(size // 2 + 1) * SR / size
    f, share, turn = np.transpose(sharing)
    share = np.clip(np.interp(hz, f, share), 0, 1)
    turn = np.interp(hz, f, turn)
    left, right = rfft([dry[0], np.roll(dry[1], 1)], size)
    own = np.where(hz < f[1], 1 - share, np.sqrt(1 - share ** 2))
    return irfft([left, share * left * np.exp(1j * turn) + own * right], size)[:, :N]


def low_pass(x):
    return signal.sosfilt(signal.butter(12, 16430, fs=SR, output="sos"), x)


def record(dry):
    clipped = np.clip(housing(dry), -1, 1)
    lowpass = signal.ellip(10, .2, 90, 16050, fs=SR, output="sos")
    return low_pass(signal.sosfilt(lowpass, clipped))


dry = scene()
out = record(dry)
unload_audio(out)
```